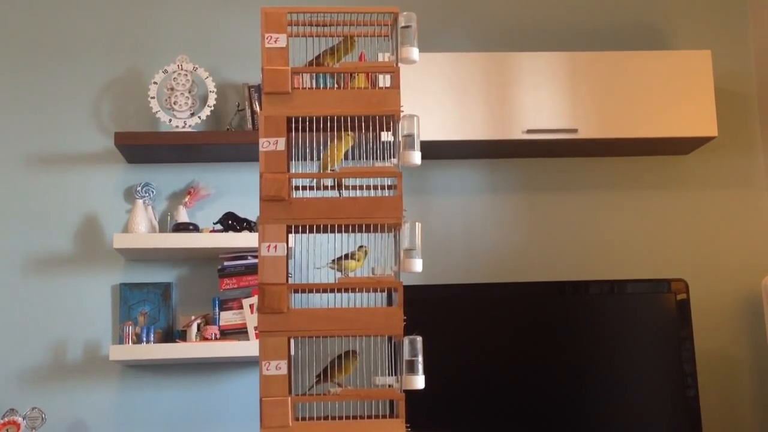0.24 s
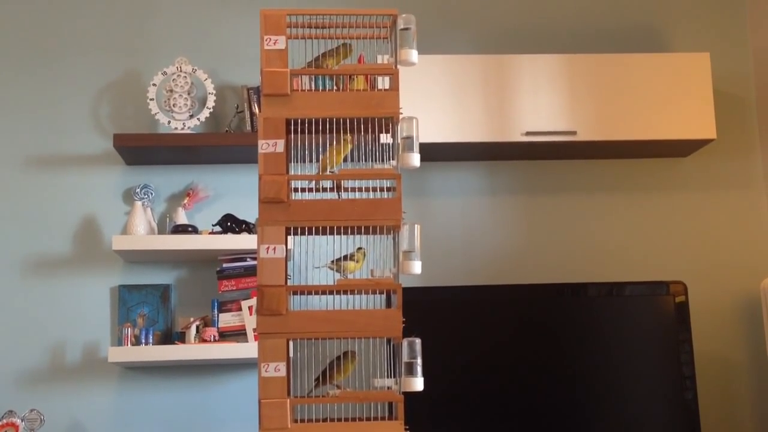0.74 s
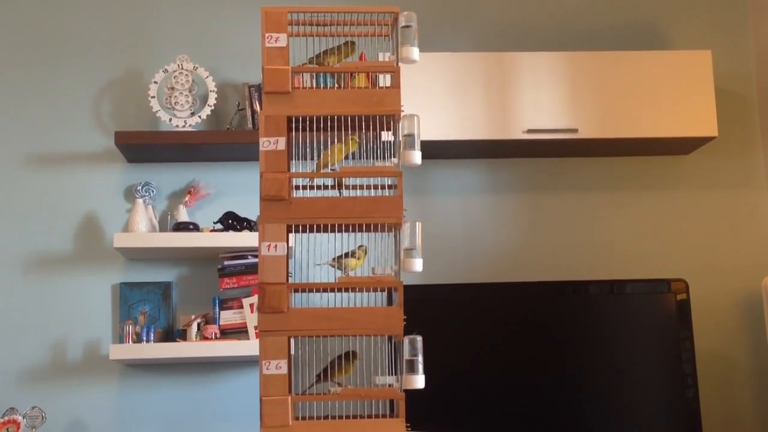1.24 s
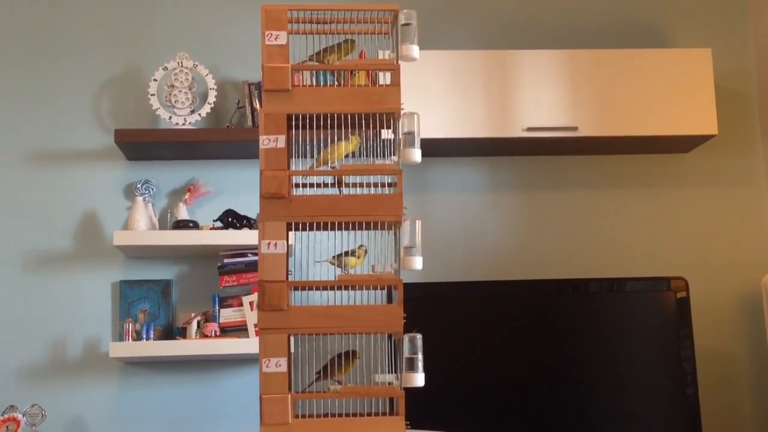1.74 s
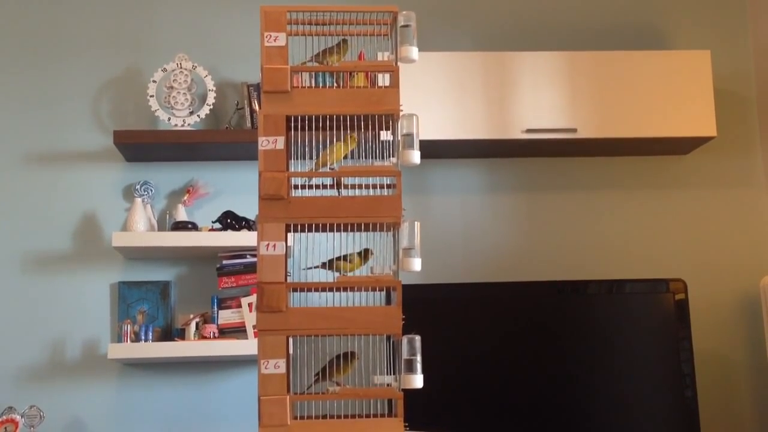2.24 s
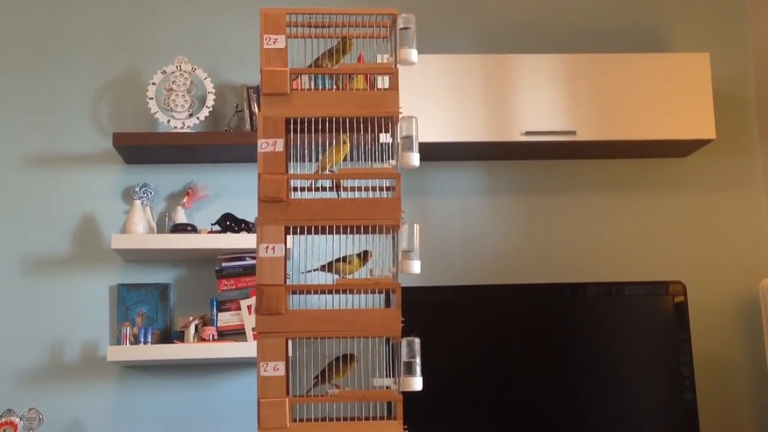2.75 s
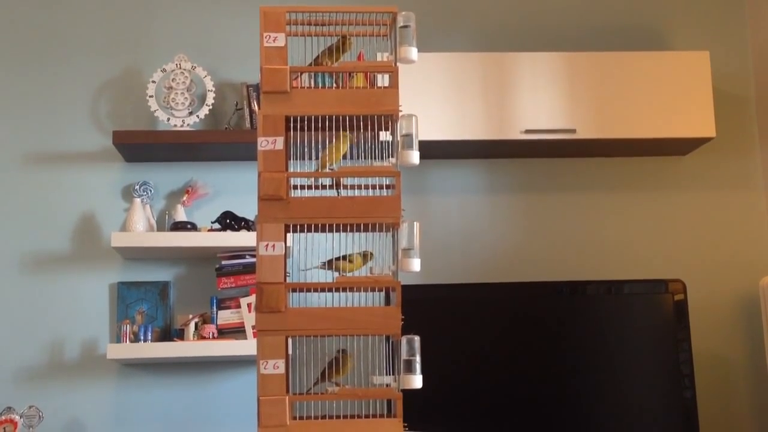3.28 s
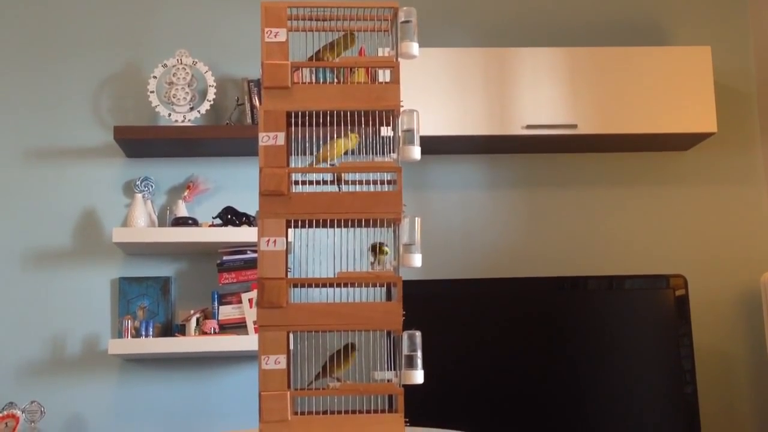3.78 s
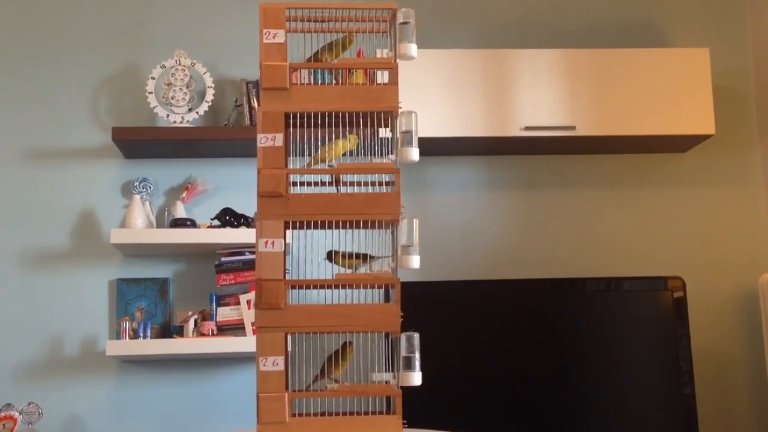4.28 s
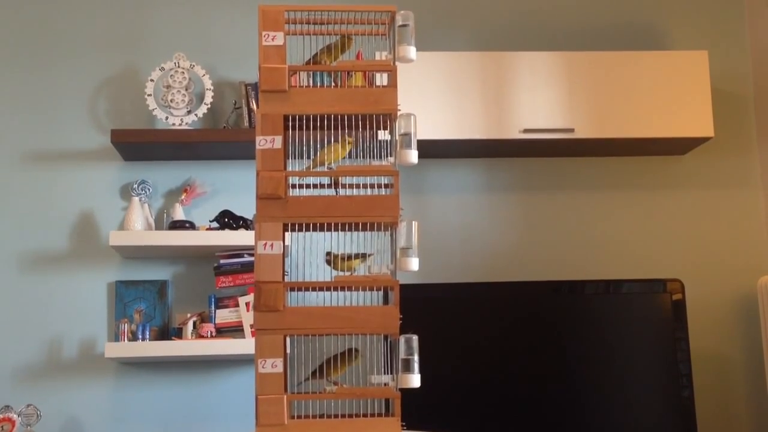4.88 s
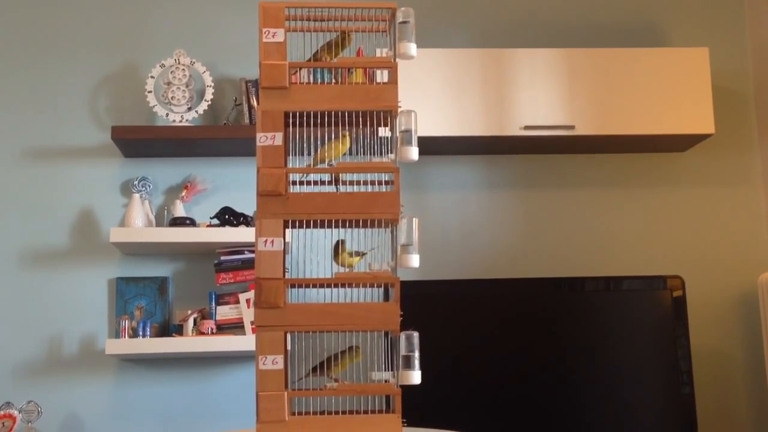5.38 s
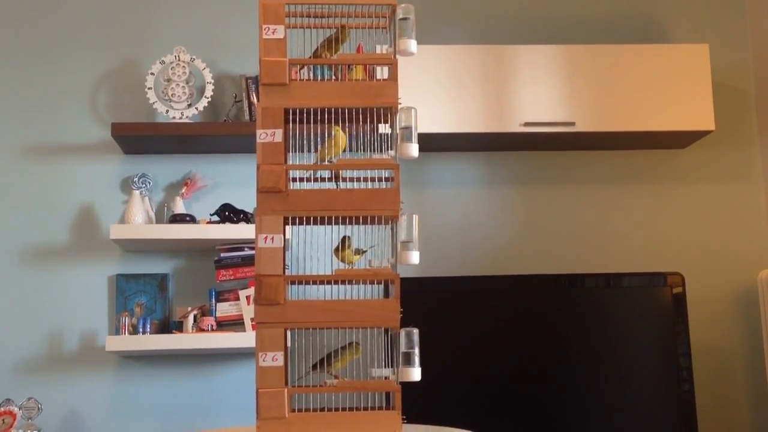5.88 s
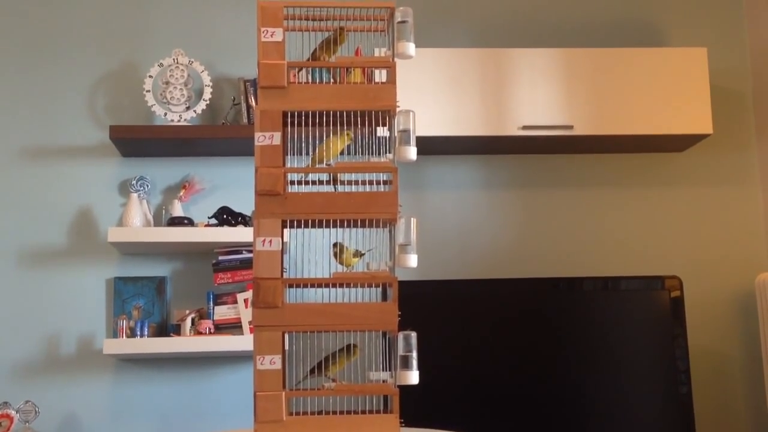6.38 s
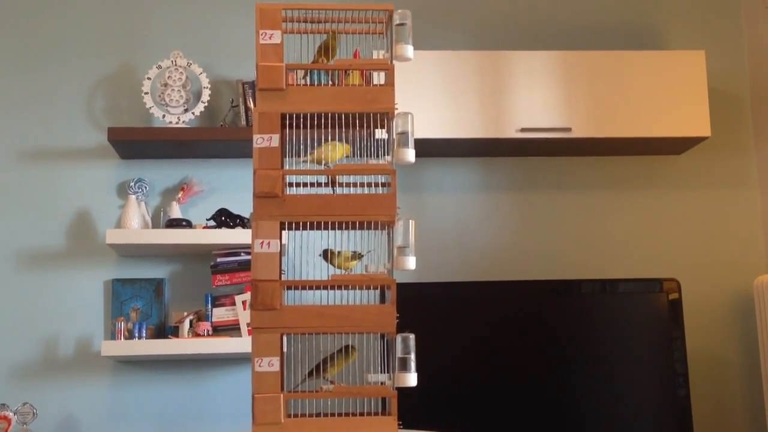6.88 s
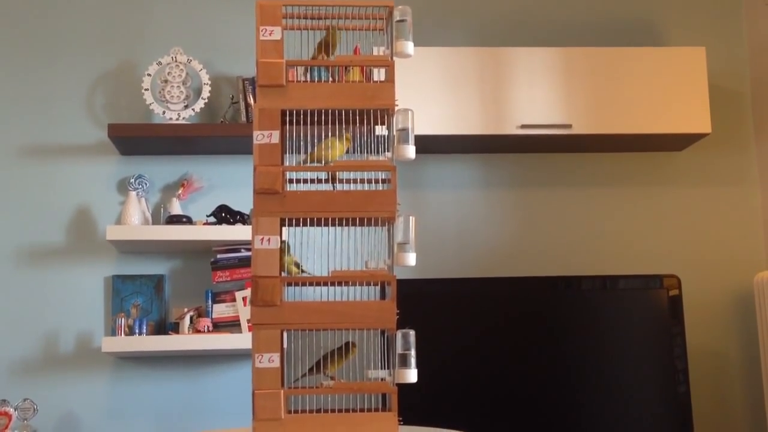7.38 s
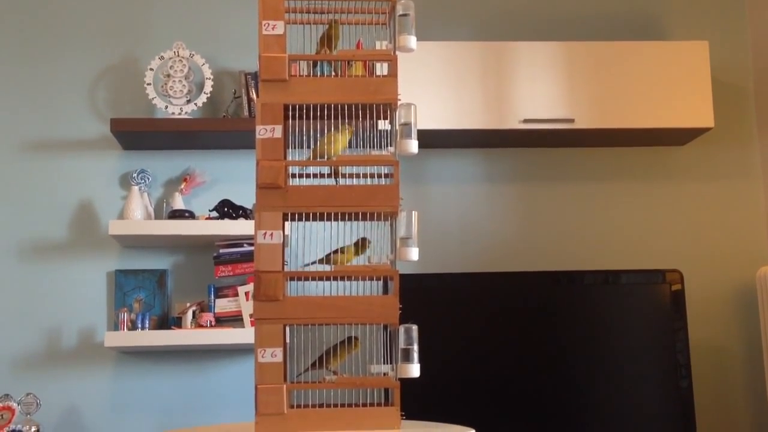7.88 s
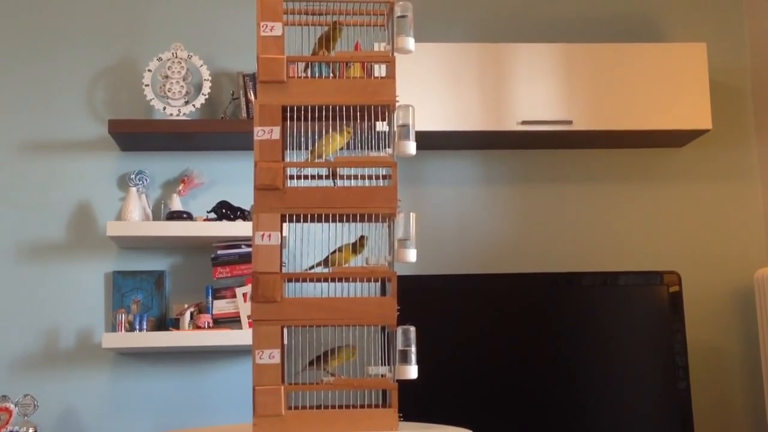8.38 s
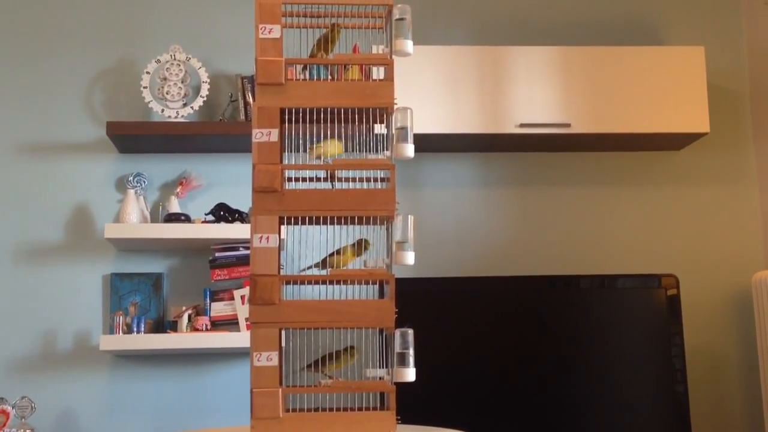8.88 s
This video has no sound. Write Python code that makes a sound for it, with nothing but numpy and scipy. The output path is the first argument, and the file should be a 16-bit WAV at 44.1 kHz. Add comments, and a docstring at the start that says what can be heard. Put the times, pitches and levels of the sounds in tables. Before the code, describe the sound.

Several caged canaries sing together in a reverberant living room, at some distance from the microphone, over still air and a faint low hum. Earlier song rings away at the start, with clear whistles and a long falling note near 0.2 s. From 0.3 to 2.2 s falling slurs repeat steadily, with three very high wheezy whistles around 0.3-1.1 s. From 2.2 to 3.4 s rising notes, high crests and quick upward flicks interlock. Drawn whistles follow, then a soft low roll from 3.5 s. Wings swish briefly around 4.2 s; the wheezy motif returns from 4.3 to 5.2 s among level toots, low slurs and soft rising notes. A quiet roll and churr lead to short falling chirps from 6.4 to 7.3 s. A faint flutter comes near 7.1 s, then rapid peeps until 8.4 s. A fast high ticking trill strengthens from 7.9 s and continues to the end at about 9.1 s, over faint deeper chirps.

```python
"""Caged canaries sing together in a living room, over a faint electrical hum and still air.
Runs of one repeated syllable overlap and follow each other: slurs, rising notes, low rolls, fast trills.
Each syllable is a nearly pure gliding sine with faint overtones; clear and wheezy whistles are drawn longer.
Noise swishes stand for wings; early echoes and a decaying noise tail smear every glide.
At the start, shaped noise dies away as the remains of earlier song."""
import sys
import numpy as np
from scipy import signal
from scipy.fft import rfft, irfft
from scipy.io import wavfile
from scipy.ndimage import uniform_filter1d, map_coordinates

SR = 44100
rng = np.random.default_rng(int(sys.argv[2]) if len(sys.argv) > 2 else 0)


def unload_wav(signal):
    """Save mono or channel-first audio to the path in sys.argv[1] as 16-bit WAV at rate SR, clipped to [-1, 1]."""
    wavfile.write(
        sys.argv[1],
        SR,
        np.round(np.clip(np.atleast_2d(signal).T, -1, 1) * 32767).astype(np.int16),
    )


N = 403074


def amp(db):
    """Decibel law: 20 dB are a tenfold amplitude."""
    return 10 ** (np.asarray(db) / 20)


def evened(x):
    """Power normalisation: scales to an rms of one."""
    return x / np.sqrt(np.mean(x ** 2) + 1e-20)


def read(points, hz):
    """Interpolation on a log-frequency axis, where equal steps are equal intervals."""
    f, value = np.transpose(points)
    return np.interp(np.log(hz + 1), np.log(f), value)


def noise(spectrum):
    """Spectral shaping: white noise is weighted by a colour and scaled to an rms of one."""
    white = rfft(rng.standard_normal(N))
    gain = amp(read(spectrum, np.fft.rfftfreq(N, 1 / SR)))
    return evened(irfft(white * gain, N))


def wander(count, rate):
    """Band-limited chance: a smooth curve through new random values, rate of them a second."""
    values = rng.standard_normal(400)
    return map_coordinates(values, [np.arange(count) * rate / SR], order=3, mode="wrap")


def add(mix, s, sound):
    """Superposition: a sound is summed into the mix at s seconds, cut at the ends of the scene."""
    at = round(s * SR)
    sound = sound[:, max(-at, 0):]
    part = mix[:, max(at, 0):][:, :sound.shape[1]]
    part += sound[:, :part.shape[1]]


def background(air_db=-61):
    """Stationary sources: broadband still air, and an appliance's hum as sines of slightly wavering level."""
    # Colour of the room air, before scaling to air_db: f/Hz, relative level/dB
    air_colour = [(25, -35), (50, -2), (90, 3), (150, 5), (250, 5), (400, -1.5), (700, -6), (1500, -8.5),
                  (3500, -7), (5500, -13.5), (9000, -18), (15000, -15.5)]
    # Partials of the hum, before its waver: f/Hz, rms level/dB
    hum_partials = [(166.3, -58), (366, -86.5)]
    t = np.arange(N) / SR
    hum = sum(np.sqrt(2) * amp(db) * np.sin(2 * np.pi * hz * t) for hz, db in hum_partials)
    return amp(air_db) * noise(air_colour) + hum * (1 + .04 * wander(N, 4.5))


def dying_note(db=-33, t60=1.0):
    """Exponential decay: earlier song still rings in the room, falling 60 dB in t60 seconds."""
    # f/Hz, relative level/dB
    colour = [(2000, -43), (2700, -10.5), (3200, -3.5), (4100, -1.5), (5600, -15.5), (7000, -41)]
    decay_db = -60 * np.arange(N) / SR / t60
    return noise(colour) * amp(db + decay_db)


def syrinx(hz, db, second_db, third_db):
    """Source and filter: a membrane sings a near sine; the throat lets only faint overtones out."""
    # Colour of the overtones as they are heard: f/Hz, level/dB added to each overtone
    beak = [(4500, -21.5), (6500, -23.5), (7500, -13), (8200, 4.5), (9300, 2.5), (10500, 8.5), (12500, 6),
            (15000, 13)]
    phase = 2 * np.pi * np.cumsum(hz) / SR
    tone = np.sin(phase)
    for k, overtone_db in enumerate([second_db, third_db, third_db - 12.5], 2):
        overtone = amp(overtone_db + read(beak, k * hz)) * np.sin(k * phase)
        tone += overtone * (k * hz < SR / 2)  # none above the Nyquist frequency
    # the valve opens and shuts within milliseconds; edges is the share of both tapers together
    edges = min(.005 * SR / len(hz), 1)
    return amp(db) * tone * signal.windows.tukey(len(hz), edges)


def scatter(note, direct_db, count=30):
    """Early reflection: cage, wall and shelves echo, anew with every turn of the head; echoed and bare note."""
    delay_s = rng.uniform(.001, .03, count)
    sign = rng.choice([-1, 1], count)
    paths = np.zeros(SR // 32)
    paths[(delay_s * SR).astype(int)] = sign * np.exp(-delay_s / 0.016)
    paths /= np.linalg.norm(paths)
    paths[0] = amp(direct_db)  # direct sound against all the echoes together
    heard = signal.fftconvolve(note, paths)
    heard = heard * np.linalg.norm(note) / np.linalg.norm(heard)  # keeps the note's energy
    bare = np.pad(note, (0, len(paths) - 1))
    return np.array([heard, bare])


def drawn_note(length, first_hz, last_hz, db, flutter, bow=0.754, swell_db=17, flutter_rate=700, direct_db=5):
    """Frequency modulation: a drawn note swells as it glides; a fast flutter makes it wheezy."""
    u = np.linspace(0, 1, round(length * SR))
    glide_hz = first_hz + (last_hz - first_hz) * u ** bow
    hz = glide_hz * (1 + flutter * wander(len(u), flutter_rate))
    arch_db = swell_db * (np.sqrt(abs(np.sin(np.pi * u ** 1.08))) - 1)
    return scatter(syrinx(hz, db + arch_db, second_db=-46.5, third_db=-39.5), direct_db)


def whistles():
    """Sustained phonation: single clear whistles, and a motif of high wheezy ones sung twice."""
    # Clear drawn whistles, and a brief 4 kHz blip just after the opening slur: start t/s, length/s, first f/Hz,
    # last f/Hz, level/dB
    clear_notes = [(-.03, 0.063, 4150, 4050, -23), (-.02, .06, 3230, 3157, -32),
                   (0.269, 0.042, 3380, 3136, -30), (0.306, 0.011, 4050, 3880, -19.5),
                   (3.177, 0.18, 3114, 3240, -27), (3.359, 0.16, 3170, 3008, -28.5),
                   (3.546, 0.23, 3154, 3010, -31), (3.653, 0.08, 4200, 4520, -45.5),
                   (3.821, 0.089, 4205, 4350, -42), (4.137, .025, 4400, 5280, -44),
                   (4.252, 0.048, 3674, 3546, -24), (7.122, 0.016, 4230, 4780, -43.5),
                   (7.332, .16, 2342, 2448, -32), (7.524, 0.017, 2410, 2460, -28.5),
                   (7.568, 0.1, 2430, 2670, -26.5), (7.722, 0.04, 2623, 2553, -29.5)]
    # Motif of three wheezy whistles: t/s into the motif, length/s, first f/Hz, last f/Hz,
    # level/dB relative to the singing, bow of the glide (exponent: over 1 moves late)
    wheeze = [(0, 0.17, 7760, 8460, -1.5, .7), (0.306, 0.27, 6490, 7400, -0.5, 0.73),
              (0.67, 0.15, 7120, 7740, 4, 2.1)]
    # Singings of the motif: t/s, level/dB
    singings = [(0.289, -29), (4.335, -27.5)]
    clear_flutter, wheeze_flutter = 0.0084, 0.012  # shares of the pitch
    out = np.zeros((2, N))
    for start, *note in clear_notes:
        add(out, start, drawn_note(*note, clear_flutter))
    for start, effort_db in singings:
        for delay, length, first_hz, last_hz, db, bow in wheeze:
            note = drawn_note(length, first_hz, last_hz, effort_db + db, wheeze_flutter, bow)
            add(out, start + delay, note)
    return out


def bout(first, last, count, slowing, first_db, middle_db, last_db, first_pitch, last_pitch):
    """Quasi-periodic rhythm: a beat slows as the bird tires, or quickens if slowing is negative."""
    uneven_db, uneven_pitch = 1.1, 0.00793  # chance differences between syllables: dB, pitch factor
    u = np.linspace(0, 1, round(count))
    chance = rng.standard_normal((len(u), 2))
    times = first + (last - first) * (u - slowing * u * (1 - u))
    # one arch of effort through the three levels
    effort_db = np.polyval(np.polyfit([0, .5, 1], [first_db, middle_db, last_db], 2), u)
    pitch = first_pitch + (last_pitch - first_pitch) * u
    return zip(times, effort_db + uneven_db * chance[:, 0], pitch + uneven_pitch * chance[:, 1])


def bouts(table):
    """Rhythm by concatenation: t/s, level/dB and pitch factor of every syllable in a table of bouts."""
    return [note for row in table for note in bout(*row)]


def phrase(gesture, notes, db, direct_db, second_db, third_db, waver=0.0098, shimmer_db=2.5):
    """Motor repetition: one gesture recurs, never quite alike, as pitch and level tremble."""
    u, pitch, level = np.transpose(gesture)
    t = np.arange(u[0], u[-1], 1 / SR)
    hz = uniform_filter1d(np.interp(t, u, pitch), size=130)  # muscles round the corners
    out = np.zeros((2, N))
    for s, effort_db, stretch in notes:
        sung_hz = hz * stretch * (1 + waver * wander(len(t), 419.6))
        sung_db = np.interp(t, u, level) + effort_db + db + shimmer_db * wander(len(t), 209.46)
        sung = syrinx(sung_hz, sung_db, second_db, third_db)
        add(out, s + t[0], scatter(sung, direct_db))
    return out


def syllables():
    """Direct and reflected sound: all repeated phrases; a negative direct_db lets the echoes prevail."""
    # Columns of a gesture: t/s from the syllable's time, f/Hz before the pitch factor, relative level/dB
    # Columns of a bout: first t/s, last t/s, syllables, slowing as a share of the pace,
    #   first, middle and last relative level/dB, first and last pitch factor
    # Columns of accented syllables: t/s, relative level/dB, pitch factor

    # Long falling opening: gesture, accented syllables
    opening = [(-.175, 7700, -26), (-.138, 7400, -24), (-.121, 6400, -13), (-.098, 6150, -10),
               (-.036, 4900, -3), (-.015, 4350, 1), (0, 4080, 4), (.012, 3980, -4), (.028, 3650, -14),
               (.035, 2800, -16), (.042, 1950, -29)]
    openings = [(.236, -20.5, 0.96)]
    song = phrase(opening, openings, db=1.0, direct_db=-4, second_db=-33.5, third_db=-43, waver=0.0076)

    # Long falling slur: gesture, bouts
    slur = [(-.158, 5950, -28), (-.135, 5550, -13), (-.115, 5200, -2), (-.085, 4500, 2), (-.06, 4000, 1),
            (-.038, 3680, 0), (-.018, 3200, -2), (-.01, 2880, -9), (-.004, 2250, -8), (0, 1700, -16),
            (.005, 950, -27)]
    slurs = [(.493, 2.203, 9, .039, -22, -22, -24, 1, 1)]
    song += phrase(slur, bouts(slurs), db=-1.0, direct_db=-1.5, second_db=-40, third_db=-44.5,
                   waver=0.0052, shimmer_db=2)

    # Falling slur from a high start: gesture, accented syllables
    high_slur = [(-.087, 7400, -25), (-.068, 6300, -18), (-.03, 4900, -10), (-.008, 4200, -1),
                 (.004, 4020, -2), (.02, 3750, -14)]
    high_slurs = [(1.187, -20, 1), (1.326, -17.5, 1.01), (1.464, -15, 1.017), (1.603, -18, 1.006),
                  (1.745, -18, 1), (1.885, -17.5, 1.035), (2.024, -18.5, 1.02)]
    song += phrase(high_slur, high_slurs, db=-2.5, direct_db=-3, second_db=-38, third_db=-37.5, waver=0.0068)

    # Upward leap: gesture, accented syllables
    leap = [(-.045, 4090, -3), (-.028, 4850, -20.5), (-.003, 5040, -15.5), (.012, 6470, -24.5),
            (.04, 6750, -12), (.075, 6710, -20)]
    leaps = [(2.31, -23, .995)]
    song += phrase(leap, leaps, db=9, direct_db=6, second_db=-36.5, third_db=-44, waver=0.0056)

    # Rising note: gesture, bouts
    rise = [(-.006, 2770, -20), (0, 3344, -5), (.012, 3818, -0.5), (.045, 4283, -0.5), (.06, 4860, -15),
            (.072, 6000, -15.5)]
    rises = [(2.413, 3.319, 7, -.022, -18, -20.5, -20.5, 1, 0.99)]
    song += phrase(rise, bouts(rises), db=-1, direct_db=3, second_db=-38, third_db=-40.0, waver=0.007)

    # Softer rising note: gesture, bouts
    soft_rise = [(-.009, 2400, -20), (-.002, 3300, -10), (.004, 3950, 0), (.012, 4200, 2), (.042, 4350, -1),
                 (.055, 4700, -12), (.066, 5450, -18)]
    soft_rises = [(5.029, 5.792, 6, -.025, -24.5, -22, -22, 0.99, 0.99)]
    song += phrase(soft_rise, bouts(soft_rises), db=-1.0, direct_db=-3, second_db=-38.5, third_db=-39.5,
                   waver=0.017, shimmer_db=3.5)

    # High, nearly level crest: gesture, accented syllables
    crest = [(0, 6030, -12), (.012, 6037, -1), (.035, 6000, 0), (.048, 5973, -10)]
    crests = [(2.483, -23, 0.99), (2.637, -24.5, 0.99), (2.8, -27.5, 1.03), (2.948, -25.5, 0.99),
              (3.09, -25.5, 1), (3.243, -28.5, 0.99), (3.39, -26, 1), (5.103, -37.5, 0.91),
              (5.257, -36.5, .925), (5.404, -32.5, 0.91), (5.56, -30.5, 0.91), (5.712, -32, .885),
              (5.862, -32, 0.91)]
    song += phrase(crest, crests, db=-0.5, direct_db=2.5, second_db=-36.5, third_db=-48, waver=0.0089)

    # Low falling slur: gesture, accented syllables
    low_slur = [(-.145, 4250, -19), (-.105, 3950, -7), (-.07, 3650, 1), (-.045, 3400, 4), (-.028, 3150, 1),
                (-.018, 2900, -8), (-.008, 2680, 2), (-.002, 2050, -5), (.006, 1100, -18)]
    low_slurs = [(3.875, -35, 0.95), (4.088, -35.5, 0.99), (4.3, -31.5, 0.98), (4.52, -31, 0.99),
                 (4.73, -33, 1), (4.942, -30.5, 0.98), (8.505, -35.5, 0.96), (8.71, -36.5, 0.99),
                 (8.905, -36.5, 0.98), (9.088, -34.5, 1)]
    song += phrase(low_slur, low_slurs, db=1, direct_db=0.5, second_db=-9.5, third_db=-41.5,
                   waver=0.014, shimmer_db=3)

    # Low roll: gesture, bouts, and accented syllables as a churr
    roll = [(-.012, 2950, -4), (-.006, 2250, 4), (0, 1500, -2.5), (.007, 860, -10)]
    rolls = [(3.492, 4.248, 15, 0.13, -42, -45.5, -47, 1, 0.95),
             (5.547, 7.33, 35, 0.02, -48, -46, -54.5, 0.99, 1.15)]
    churrs = [(5.962, -43, 1.01), (6.012, -41, 1.13), (6.063, -41, 1), (6.114, -46.5, .98),
              (6.165, -46, 1.1), (6.217, -46.5, 1.1), (6.268, -38.5, 1), (6.325, -42, 1.07),
              (6.372, -44.5, 0.95)]
    song += phrase(roll, bouts(rolls), db=5.0, direct_db=-5.5, second_db=-37, third_db=-25.5, waver=0.025)
    song += phrase(roll, churrs, db=4.5, direct_db=-5, second_db=-38, third_db=-30, waver=0.022)

    # Short falling chirp: gesture, accented syllables
    chirp = [(-.03, 3400, -12), (-.021, 3200, 2), (-.011, 3000, 6), (-.004, 2700, 0), (0, 2000, -10),
             (.006, 1100, -11)]
    chirps = [(6.425, -34, 0.91), (6.487, -31.5, 0.96), (6.55, -31, 0.96), (6.619, -31, 0.97),
              (6.684, -34.5, 0.94), (6.749, -32.5, 0.95), (6.815, -30.5, 0.98), (6.881, -30, 1.006),
              (6.948, -35.5, 1), (7.014, -32.5, .99), (7.082, -31.5, 0.97), (7.155, -32.5, 0.94),
              (7.22, -32, 0.95), (7.288, -35, 0.89)]
    song += phrase(chirp, chirps, db=-0.5, direct_db=-3.0, second_db=-10.5, third_db=-39.0)

    # Further falling chirps, later and at nearly the same pitch: gesture, bouts
    late_chirp = [(-.026, 3350, -2), (-.016, 3030, 5), (-.007, 2700, 8), (-.001, 2050, 1),
                  (.008, 1050, -12)]
    late_chirps = [(8.488, 9.122, 10, .01, -37, -36, -36, 0.99, 1)]
    song += phrase(late_chirp, bouts(late_chirps), db=0.0, direct_db=-4.5, second_db=-43, third_db=-36.5)

    # Peep that rises and holds: gesture, accented syllables
    peep = [(-.016, 2900, -24), (-.009, 3290, -4), (-.002, 3390, 0), (.014, 3390, -3)]
    peeps = [(7.14, -27, 0.98), (7.19, -22, 0.98), (7.24, -23, 0.97), (7.288, -23, 1), (7.333, -24, 0.99),
             (7.382, -22.5, 0.99), (7.43, -21, 1), (7.485, -25, 1), (7.533, -20, 1), (7.583, -26, 0.97),
             (7.635, -21.5, 0.99), (7.683, -23.5, 1), (7.73, -22.5, 1), (7.782, -25.5, .99),
             (7.83, -27, 0.95), (7.88, -27, 0.94), (7.938, -28, 0.99), (7.988, -22.5, 1),
             (8.04, -26.5, 0.96), (8.094, -23.5, 1), (8.15, -30.5, 0.92), (8.198, -23, 1),
             (8.248, -27.5, 1), (8.305, -23.5, 0.98), (8.362, -26.5, 0.99), (8.411, -24.5, 1)]
    song += phrase(peep, peeps, db=1, direct_db=5.5, second_db=-15, third_db=-45, waver=0.0024)

    # Short tick of a fast trill: gesture, bouts
    tick = [(-.018, 3430, -11.5), (-.006, 3933, -1), (.001, 4020, -9), (.007, 3850, -29.5)]
    ticks = [(7.172, 7.693, 13, 0.0048, -36, -33.5, -34, 1.02, 1),
             (7.851, 9.124, 31, .06, -26.5, -20.5, -22, 1, 0.98)]
    song += phrase(tick, bouts(ticks), db=-3.0, direct_db=2, second_db=-26.5, third_db=-42.0, waver=0.003)

    # Quick upward flick: gesture, bouts
    flick = [(-.004, 1945, -15.5), (.006, 2634, -8.5), (.018, 3500, -9.5), (.04, 3744, 7)]
    flicks = [(2.222, 3.089, 13, 0.00995, -28.5, -28, -26, 1, 0.95)]
    song += phrase(flick, bouts(flicks), db=-1.0, direct_db=-4.5, second_db=-56, third_db=-48)

    # Nearly level toot: gesture, bouts
    toot = [(-.015, 2950, -7), (0, 3000, 1), (.015, 2970, -6)]
    toots = [(4.46, 5.441, 12, 0.00075, -29, -27.5, -30, 1.02, .95)]
    song += phrase(toot, bouts(toots), db=-2.0, direct_db=13, second_db=-40, third_db=-46, waver=0.0055)

    # Short low pip: gesture, bouts
    pip = [(-.011, 2560, -2), (0, 2610, -1), (.011, 2620, -3)]
    pips = [(7.885, 8.4, 9, 0, -33, -36, -41, 1, 1)]
    song += phrase(pip, bouts(pips), db=2.0, direct_db=1, second_db=-40, third_db=-35, waver=0.0023)
    return song


def wings(beat_hz=24):
    """Amplitude-modulated turbulence: a bird flutters from perch to perch in swishes of feathers."""
    # Swishes: t/s, half length/s (to 1/e), level/dB before the beat
    wingbeats = [(4.155, 0.027, -42.5), (4.32, 0.038, -47.5), (7.12, 0.02, -54.5), (7.19, 0.034, -62)]
    t = np.arange(N) / SR
    effort = sum(amp(db) * np.exp(-((t - s) / width) ** 2) for s, width, db in wingbeats)
    # f/Hz, relative level/dB
    feathers = noise([(300, -26.0), (2000, 2), (5000, 2.0), (7000, -13.0), (10000, -21), (15000, -25)])
    return feathers * effort * (1 + 0.41 * np.sin(2 * np.pi * beat_hz * t))


def room(x, wet_db=-4, build_s=0.0058, count=3, shift_s=.55):
    """Diffuse reverberation: a tail dies by frequency; its pattern shifts over shift_s as the birds turn about."""
    # Reverberation time: f/Hz, t60/s
    decay_times = [(1000, 0.46), (2500, 0.7), (4500, 0.51), (8000, 0.47), (15000, 0.42)]
    at = np.arange(200, SR - 16, 16)  # about one echo every 16 samples
    turn = np.arange(N) / SR / shift_s
    early, bare = x
    wet = np.zeros(N)
    for k in range(count):
        taps = np.zeros(SR)
        taps[at + rng.integers(0, 16, len(at))] = rng.standard_normal(len(at))
        hz, t, z = signal.stft(taps, SR, nperseg=256)
        decay = amp(-60 * t / read(decay_times, hz)[:, None])
        build = 1 - np.exp(-t / build_s)
        tail = signal.istft(z * decay * build, SR, nperseg=256)[1]
        # the tails take turns, at constant total power
        share = np.sqrt(2 / count) * np.cos(np.pi * (turn + k / count))
        wet += signal.fftconvolve(bare * share, tail / np.linalg.norm(tail))[:N]
    return early + amp(wet_db) * wet


def scene():
    """Superposition: birds and wings in their room, the dying song and the background."""
    birds = syllables() + whistles() + wings()
    return (room(birds) + dying_note() + background())[None]


def record(dry):
    """Band limitation: the recorder's linear-phase low-pass ends the treble near 15550 Hz."""
    lowpass = signal.firwin(511, 15550, window=("kaiser", 9), fs=SR)
    return signal.oaconvolve(dry, lowpass[None], "same")


dry = scene()
out = record(dry)
unload_wav(out)
```